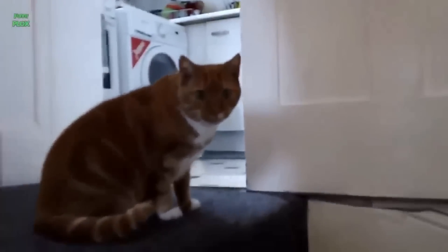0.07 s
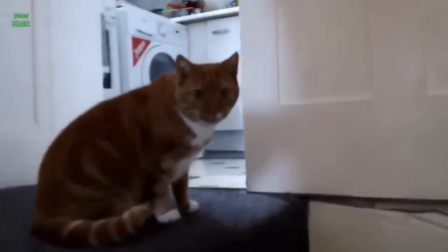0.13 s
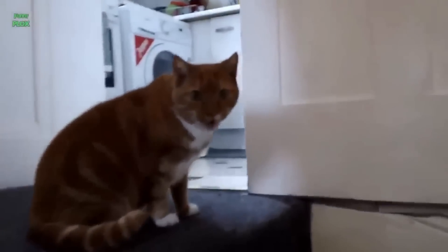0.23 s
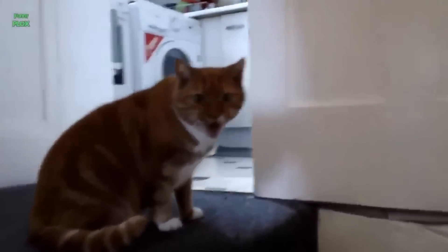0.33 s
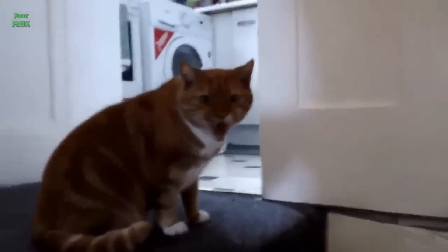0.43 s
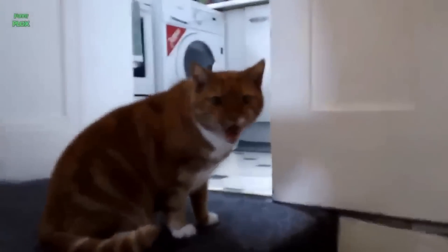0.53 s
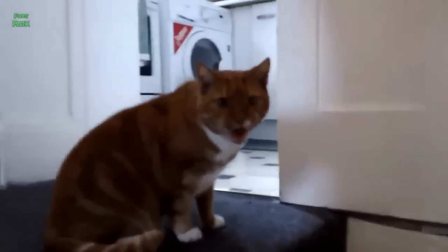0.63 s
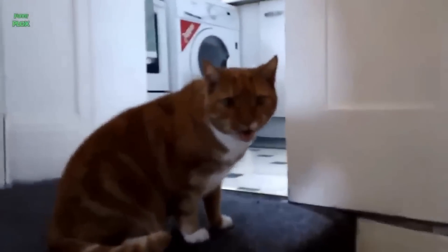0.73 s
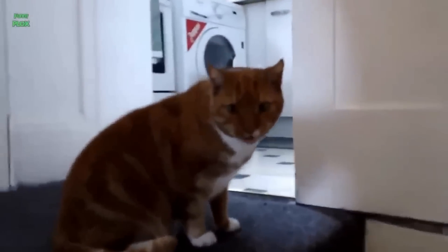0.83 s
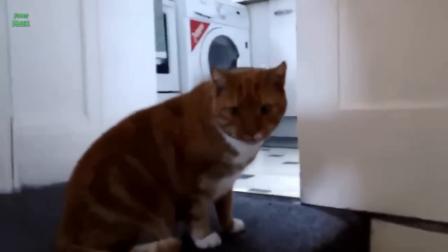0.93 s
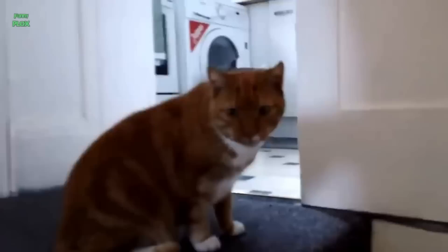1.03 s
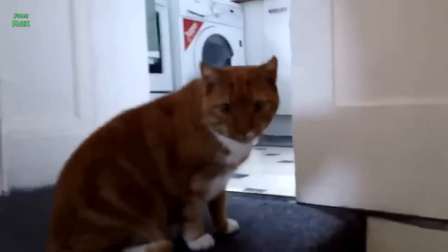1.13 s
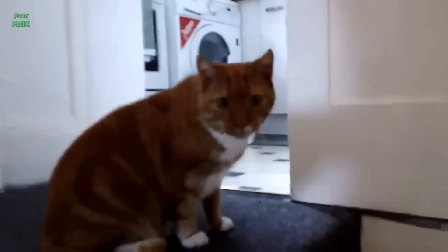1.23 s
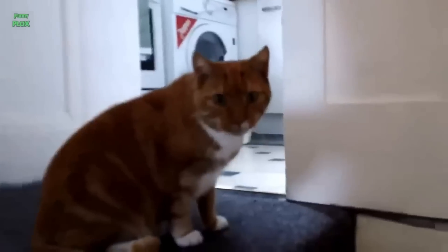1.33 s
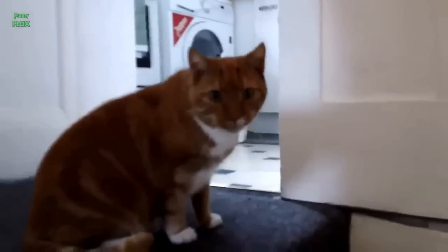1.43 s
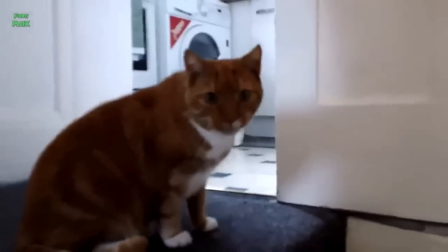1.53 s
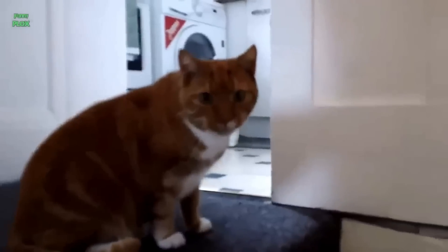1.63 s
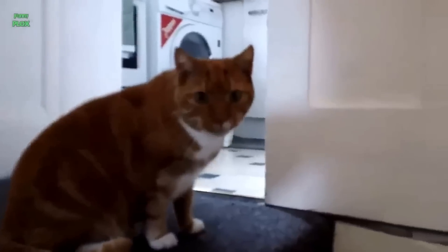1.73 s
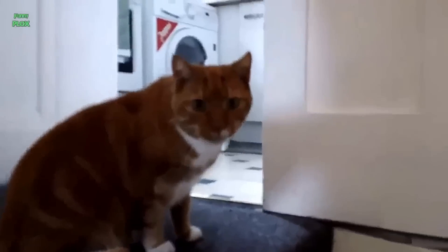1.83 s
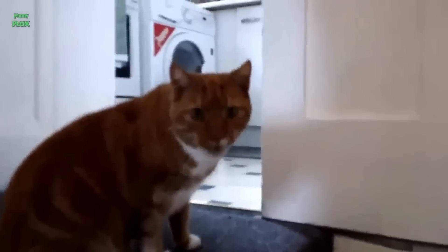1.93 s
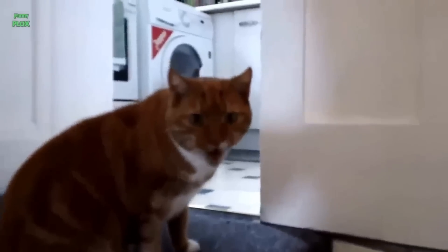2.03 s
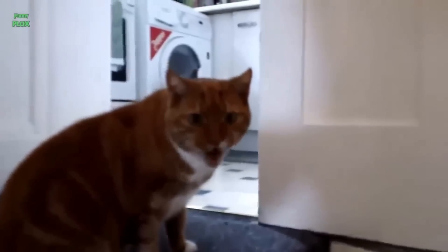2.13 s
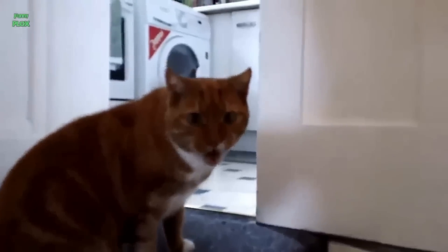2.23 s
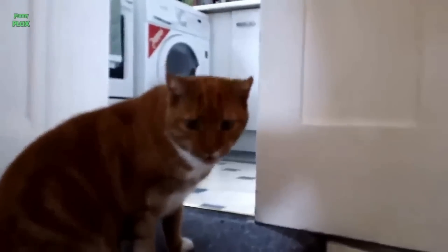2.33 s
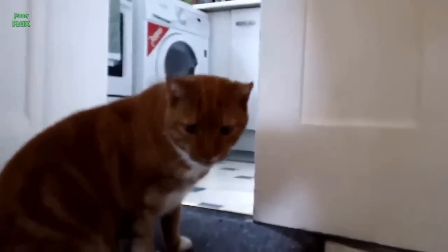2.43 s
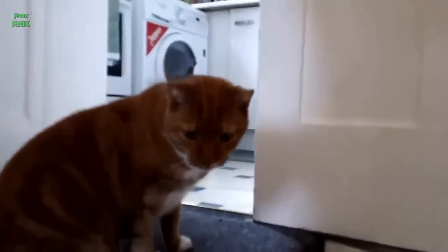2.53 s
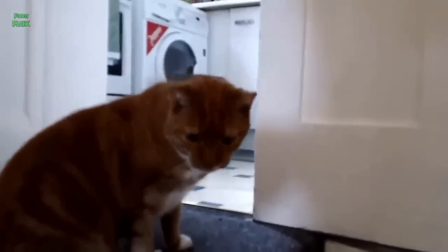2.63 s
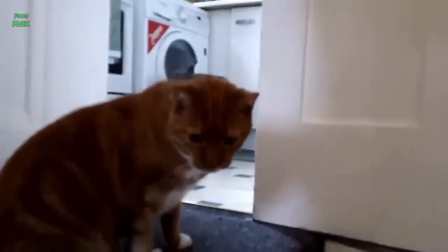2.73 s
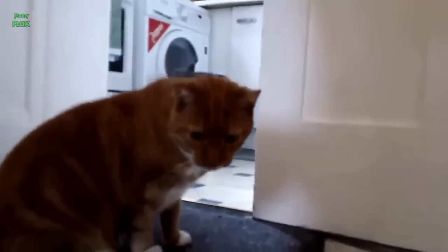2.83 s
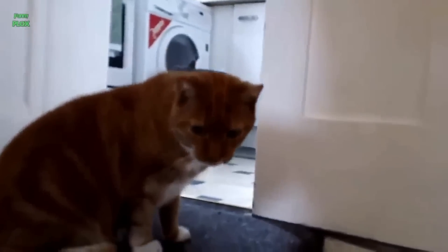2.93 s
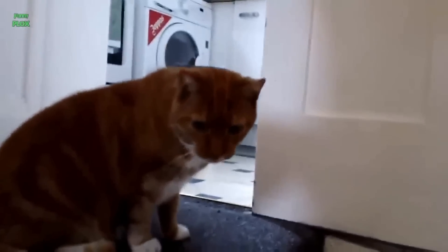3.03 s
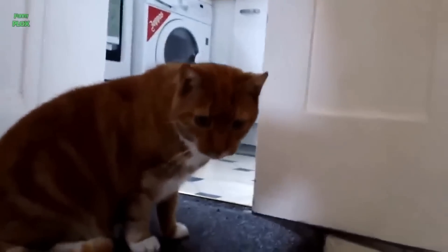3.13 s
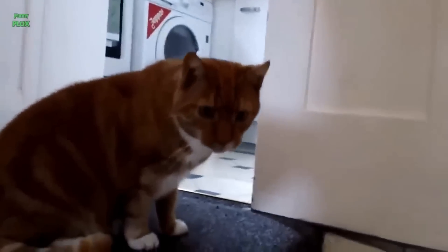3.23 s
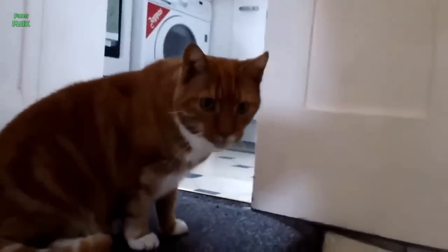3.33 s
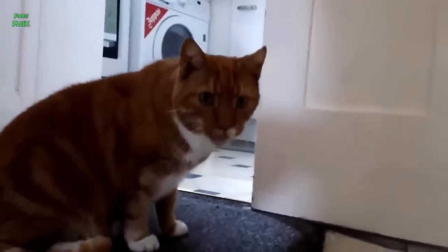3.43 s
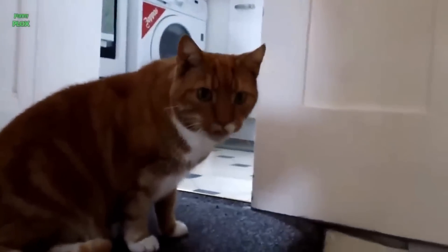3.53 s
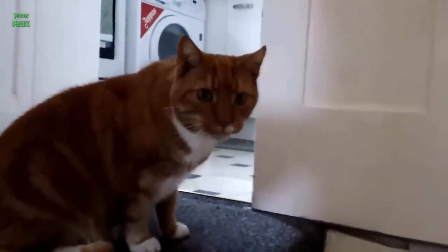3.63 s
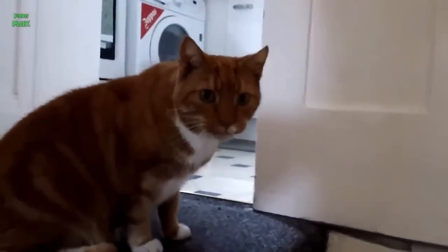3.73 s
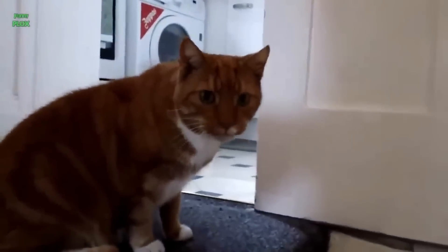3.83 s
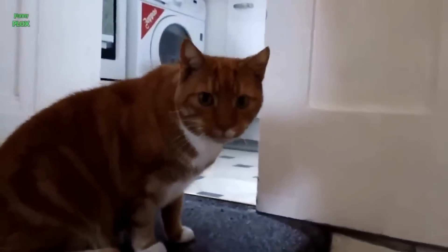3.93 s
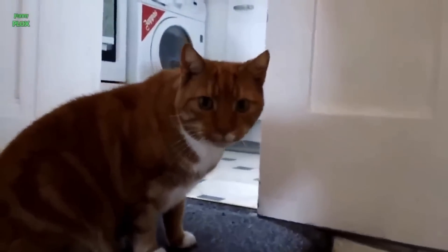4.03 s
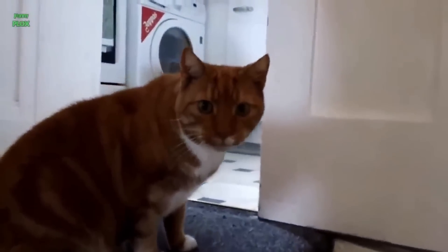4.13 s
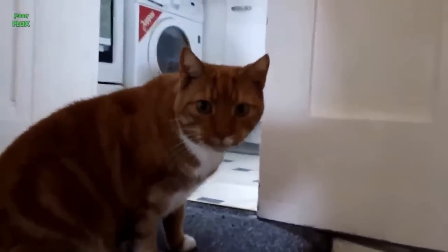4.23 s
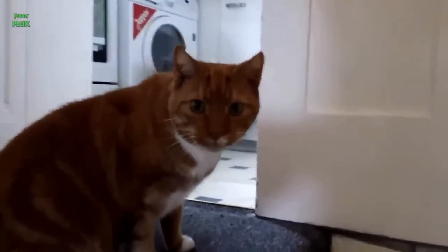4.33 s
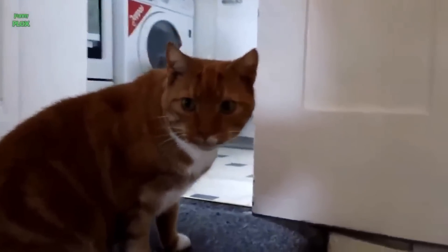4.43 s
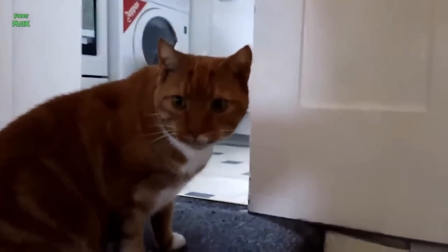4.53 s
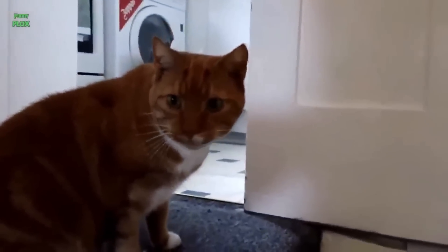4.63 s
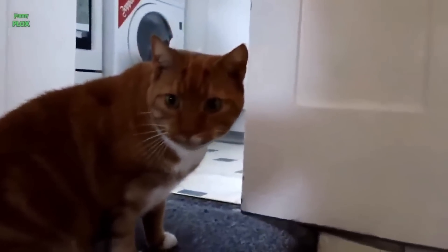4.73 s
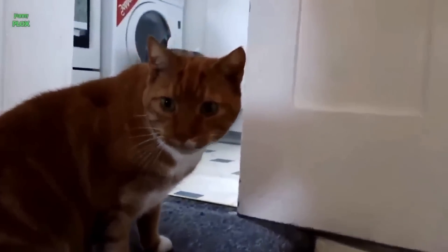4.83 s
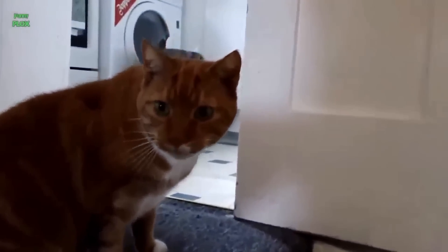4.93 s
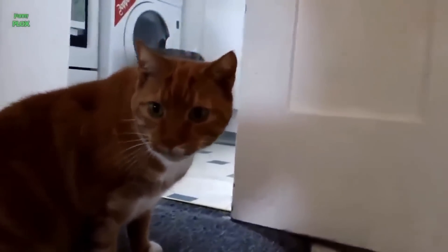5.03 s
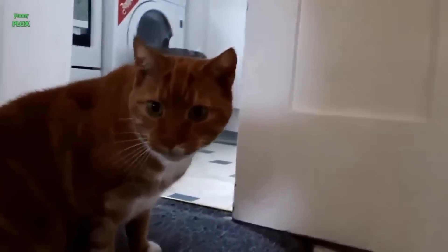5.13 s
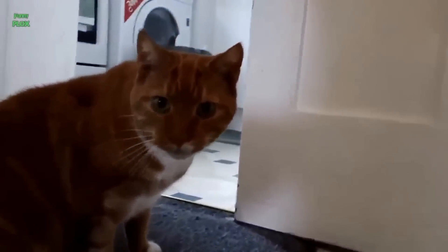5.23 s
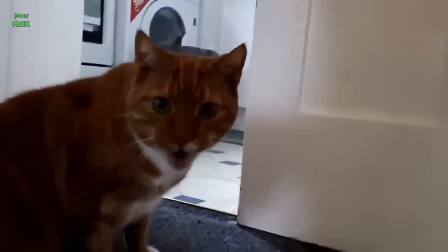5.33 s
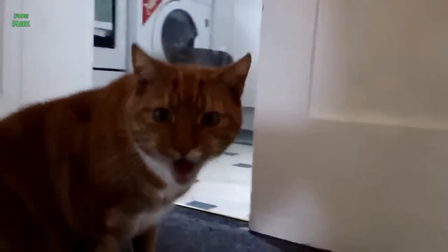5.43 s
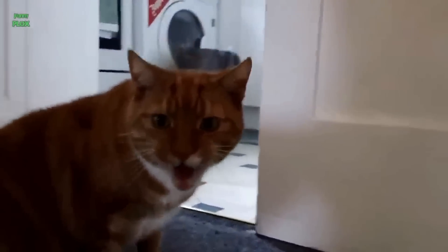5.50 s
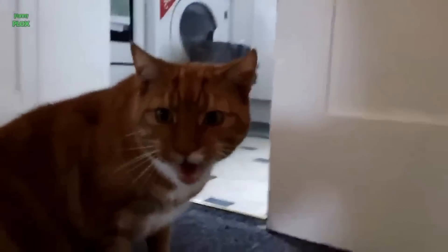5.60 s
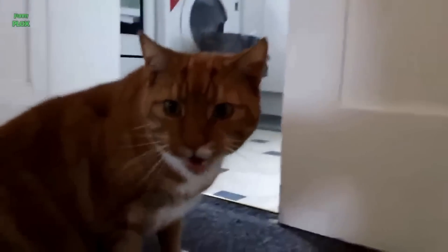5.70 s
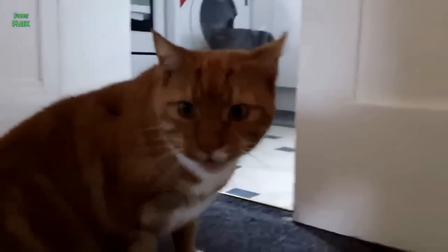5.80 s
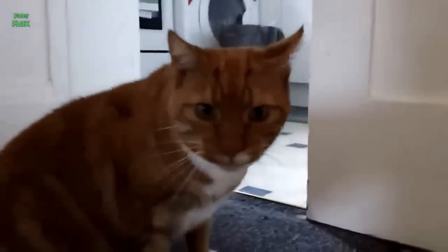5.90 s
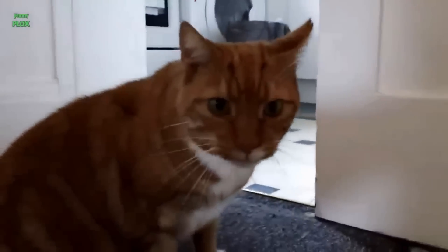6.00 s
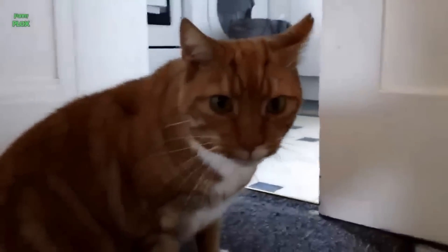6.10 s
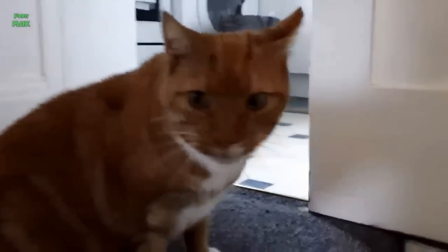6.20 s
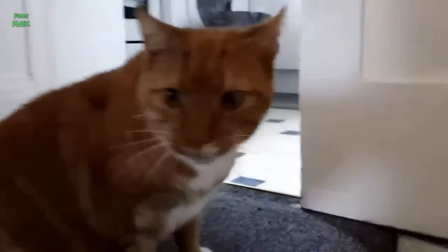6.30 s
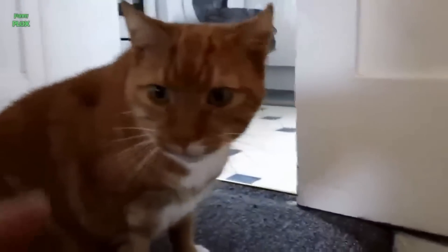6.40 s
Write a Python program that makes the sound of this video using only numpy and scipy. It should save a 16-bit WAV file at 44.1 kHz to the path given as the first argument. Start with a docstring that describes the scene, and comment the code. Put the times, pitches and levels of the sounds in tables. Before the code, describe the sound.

A quiet small room with soft hiss and barely audible appliance hum. Dull footfalls and a carpet scuff lead to a nearby cat's bright, rough-edged meow. A hard snap precedes its clipped second call, then fabric brushes and a bunch of keys jingles and lands hard on a wooden surface. The background sinks and slowly returns before one last meow. Handheld microphone, mono, short room reflections.

```python
"""Room noise, a faint hum, a few soft footfalls and a scuff on carpet; then a cat meows close by, three times in all.
Each call cracks at its start and darkens as the mouth closes: harmonics through moving resonances.
Between calls cloth scuffs, something snaps sharply, and keys rattle, land with a knock on wood and slide.
Blows are noisy pushes ringing a body; scuffs and the slide are shaped noise.
A small room answers everything but the cloth scuffs and background.
A gain control ducks the whole sound after each loud event, then creeps back.
"""
import sys
import numpy as np
from scipy import signal
from scipy.fft import rfft, irfft, next_fast_len
from scipy.io import wavfile
from scipy.ndimage import map_coordinates

SR = 44100
rng = np.random.default_rng(int(sys.argv[2]) if len(sys.argv) > 2 else 0)


def wrap_up_sound(samples):
    """Save the sound to the file named by the first command line argument, as 16-bit audio."""
    columns = np.atleast_2d(samples).T
    # keep every value between -1 and 1, then stretch to whole-number steps
    tamed = np.clip(columns, -1, 1)
    steps = np.round(tamed * 32767).astype(np.int16)
    wavfile.write(sys.argv[1], SR, steps)


N = 284886  # samples

# steady room noise, colour: freq_hz, relative_db
HUSH_COLOUR = [(15, -50), (25, -17.5), (64, -3.5), (101, -9.5), (129, -5), (226, -3), (313, -4.5),
               (456, -3.5), (759, -10), (1610, -13.5), (2540, -16), (8530, -23), (12400, -30.5),
               (15400, -18)]
# household appliance hum: freq_hz, level_db
HUM_TONES = [(66, -69.5), (98, -67)]
# room decay: freq_hz, t60_s
ROOM_DECAY = [(150, 0.29), (600, 0.34), (2500, 0.28), (6000, 0.27), (14000, 0.1)]

# soft footfalls and bumps: start_s, relative_db
THUMP_EVENTS = [(.066, -37.5), (.192, -35), (.541, -33.5), (1.025, -42.5), (2.524, -37), (2.811, -28.5),
                (2.848, -36), (3.605, -29), (4.362, -41)]
# footfall colour: freq_hz, relative_db
THUMP_COLOUR = [(30, -23), (90, -8), (150, 1), (210, 9.5), (310, -1), (480, -9.5), (1000, -23), (4000, -71)]
# scuffs of cloth on carpet: start_s, level_db, rise_s, t60_s
SCUFF_EVENTS = [(0.498, -42.5, 0.002, 0.45), (1.734, -49.5, 0.0036, 0.75), (2.52, -37.5, 0.0015, 0.65),
                (2.629, -40, 0.16, 1), (4.362, -46, 0.0024, 0.67), (5.08, -45.5, 0.017, 0.3),
                (6.086, -38.5, 0.014, 0.48)]
# cloth colour: freq_hz, relative_db
CLOTH_COLOUR = [(35, -59), (60, -26), (295, -3), (428, -7), (1880, -13), (8620, -27.5), (12500, -35.5),
                (14000, -28), (15000, -33)]

# hard, dry snap: start_s, relative_db
SNAP_EVENTS = [(2.2295, 1.5)]
# snap colour: freq_hz, relative_db
SNAP_COLOUR = [(100, -16), (700, -16.5), (1600, -15), (2100, -5.5), (2700, -0.5), (3300, 0), (3850, -11),
               (4600, -3), (5200, 0), (6100, -26), (6900, -8), (8600, -12), (11000, -18.5), (15000, -13.5)]
# light taps on something small and hollow: start_s, peak_db
TAP_EVENTS = [(2.046, -40.5), (2.523, -32), (3.017, -20), (3.102, -34), (3.478, -33), (3.4895, -21),
              (3.549, -25.5), (3.675, -5), (3.713, -21), (3.731, -22), (3.754, -24.5)]
# resonances of the hollow thing: freq_hz, width_hz, relative_db
SHELL_MODES = [(2155, 580, -5), (2830, 305, 4), (3650, 270, -1.5), (5230, 460, -9.5)]

# knocks on wood: start_s, relative_db
KNOCK_EVENTS = [(2.636, -30.5), (3.611, -13.5), (3.627, -15), (3.674, -14.5), (3.711, -24), (3.751, -31),
                (3.838, -21.5), (3.857, -25)]
# resonances of the board: freq_hz, width_hz, relative_db
WOOD_MODES = [(400, 127, -4), (623, 62, 3), (827, 110, -0.5), (1180, 163, -5), (1530, 170, -6.5),
              (1737, 100, -7), (2760, 180, -21.5)]

# clearest clinks of key against key: start_s, peak_db
CLINK_EVENTS = [(3.101, -23), (3.229, -33), (3.287, -27), (3.4, -33), (3.611, -5), (3.62, 2.5),
                (3.751, -11.5), (3.862, -26.5)]
# thin, very high tinks of metal: start_s, level_db
TINK_EVENTS = [(1.74, -33.5), (2.696, -27.5)]
# undamped modes of the keys: freq_hz, relative_db, t60_s
KEY_MODES = [(5066, -17, .12), (7170, -5, .2), (7340, -6, .2), (7930, -7, .18), (8560, -2, .18),
             (8680, -6, .27), (9600, -12, .09), (11200, -5, .24), (14100, -2, .1), (14560, 3, .2),
             (14900, 1, .1)]
# colour of the sliding keys: freq_hz, relative_db
SCRAPE_COLOUR = [(71, -61.5), (120, -11.5), (192, -21.5), (415, -0.5), (498, -17), (563, -7), (955, -9.5),
                 (2870, -11), (4300, -19), (7920, -23.5), (8770, -10), (15500, -31.5)]
# loose rattle: full level, dB gained over the rise, dB per s lost after the landing
RATTLE_START_S, RATTLE_RISE_S, RATTLE_LENGTH_S = 3.435, 0.11, 0.36
RATTLE_DB, RATTLE_RISE_DB, RATTLE_FADE_DB_PER_S = -22, 8.5, 39
LAND_S = 3.615
SLIDE_DB, SLIDE_ATTACK_S, SLIDE_HOLD_S, SLIDE_T60_S = -22, 0.0053, 0.081, 0.25

# voice through each call: time_s, pitch_hz, relative_db
VOICE_TRACKS = [
    [(0.58, 602.6, -27.5), (0.674, 564.4, -24), (0.69, 564.7, -22), (0.748, 566.9, -22),
     (0.776, 568.4, -28), (0.804, 565.5, -24.5), (0.974, 555.6, -31), (1.008, 553, -40),
     (1.024, 546, -38.5), (1.05, 557, -50)],
    [(2.315, 562, -27), (2.351, 571.5, -25.5), (2.385, 579.4, -28), (2.413, 574, -25),
     (2.475, 573.7, -34.5), (2.489, 569, -45), (2.519, 596, -46), (2.525, 593, -36), (2.587, 609.5, -40),
     (2.595, 609, -42)],
    [(5.6, 637, -27), (5.61, 626.4, -24.5), (5.682, 589.4, -24.5), (5.806, 557.6, -22.5),
     (5.812, 559.6, -24), (5.884, 548.5, -24.5), (5.902, 547.8, -28.5), (5.968, 545.8, -32),
     (6.006, 555.9, -41.5), (6.022, 548.6, -54)],
]
# crack opening each call: start_s, length_s, pitch_ratio, roughness_0_1, mouth_db
CRACK_SETTINGS = [(0.57, 0.0073, 1.29, 0.61, -3), (2.301, 0.0078, 1.19, 0.66, -4),
                  (5.579, 0.015, 1.2, 0.1, -9)]
# jaw: closing_start_s, lips_meet_s, mouth_open_hz, mouth_shut_hz, upper_open_hz
JAW_SETTINGS = [(0.716, 1.013, 2760, 1780, 3310), (2.397, 2.525, 2480, 2020, 3080),
                (5.64, 6.025, 2560, 2170, 3570)]
# call tone: upper_re_mouth_db, muzzle_re_mouth_db, throat_db, throat_tilt_db_per_octave
CALL_TONES = [(3.5, -1.5, -42, -1.5), (-5, -12.5, -44.5, 2), (-3, -6.5, -38.5, 3.5)]
# fixed throat colour: freq_hz, relative_db
THROAT_COLOUR = [(550, -3.5), (750, 3), (1150, 0), (1700, -13), (2400, -25), (4000, -50)]
# fixed muzzle colour: freq_hz, relative_db
MUZZLE_COLOUR = [(3200, -28), (3950, 1), (4500, -4), (5200, -5), (5700, -9.5), (6300, -16.5), (7200, -24.5),
                 (8500, -33), (15000, -51)]
UPPER_SHUT_HZ = 2700
UPPER_FADE_DB, MUZZLE_FADE_DB = 0.5, 13  # lost as the jaw closes
LIPS_DB, LIPS_S = 18, 0.005  # muffling of both when the lips meet
JAW_EASE = 1.7  # above 1: fast at first, slowing towards the end
RASP_BRIGHT_DB = 13.5  # muzzle boost at full roughness
THROAT_SHARE = 0.17  # how far the throat tone follows the call level, 0-1

# microphone notch in the top octave: freq_hz, gain_db
MICROPHONE_RESPONSE = [(11600, 1), (12150, -15.5), (12550, -16), (13100, -2.5), (13900, -6)]
TOP_HZ = 15500


def amp(db):
    """Amplitude ratio of a level in dB."""
    return 10 ** (np.asarray(db) / 20)


def unit(x):
    """Scale to rms 1."""
    return x / np.sqrt(np.mean(x ** 2) + 1e-20)


def clock(size):
    """Time in s of each sample."""
    return np.arange(size) / SR


def along(points, hz):
    """Interpolate (freq_hz, value) points on a log axis."""
    f, v = np.transpose(points)
    return np.interp(np.log(hz + 1), np.log(f + 1), v)


def wobble(rate_hz, size):
    """Smooth random curve, rate_hz knots a second."""
    knots = rng.standard_normal(int(size * rate_hz / SR) + 4)
    return map_coordinates(knots, [clock(size) * rate_hz])


def filtered(x, response):
    """Apply a response of frequency by FFT."""
    m = next_fast_len(len(x) + SR // 2)
    return irfft(rfft(x, m) * response(np.fft.rfftfreq(m, 1 / SR)), m)[:len(x)]


def noise(colour, size):
    """Coloured noise of rms 1."""
    return unit(filtered(rng.standard_normal(size), lambda hz: amp(along(colour, hz))))


def impulse(colour, size=4096):
    """Causal minimum-phase pulse of this colour, by folding the cepstrum."""
    cepstrum = irfft(np.log(amp(along(colour, np.fft.rfftfreq(size, 1 / SR)))))
    cepstrum[1:size // 2] *= 2
    cepstrum[size // 2 + 1:] = 0
    return irfft(np.exp(rfft(cepstrum)))


def resonator(modes):
    """Ring of a small body: decaying modes of alternating sign, no bass radiated."""
    t = clock(SR // 5)
    ring = np.zeros(len(t))
    for k, (hz, width_hz, db) in enumerate(modes):
        decay = width_hz * np.exp(-np.pi * width_hz * t)
        ring += amp(db) * decay * np.cos(2 * np.pi * hz * t) * (-1) ** k
    return signal.sosfilt(signal.butter(2, 220, "high", fs=SR, output="sos"), ring)


def blow(body, chatter, t60_s):
    """One push and a dying chatter of small contacts ring the body; peak 1."""
    t = clock(SR // 4)
    force = amp(-60 * t / t60_s) * rng.standard_normal(len(t))
    force *= chatter / np.linalg.norm(force)
    force[0] = 1  # the push
    hit = signal.fftconvolve(force, body)
    return hit / np.abs(hit).max()


def add(track, start_s, sound):
    """Mix a sound into the track."""
    part = track[max(round(start_s * SR), 0):][:len(sound)]
    part += sound[:len(part)]


def blows(events, body, chatter, t60_s):
    """A row of blows on one body."""
    out = np.zeros(N)
    for start_s, db in events:
        add(out, start_s, amp(db) * blow(body, chatter, t60_s))
    return out


def room(x, wet_db):
    """Add the room's answer: decaying noise whose treble dies first."""
    hz, t, z = signal.stft(rng.standard_normal(SR // 2), SR, nperseg=256)
    decay = amp(-60 * t / along(ROOM_DECAY, hz)[:, None])
    tail = signal.istft(z * decay, SR, nperseg=256)[1]
    tail[:round(.004 * SR)] = 0  # 4 ms before the first reflection
    return x + amp(wet_db) * signal.fftconvolve(x, tail / np.linalg.norm(tail))[:N]


def background():
    """Steady coloured noise and a faint hum, wavering in level and phase."""
    hum = np.zeros(N)
    for hz, db in HUM_TONES:
        level = amp(db + 0.68 * wobble(6.1, N)) * np.sqrt(2)
        hum += level * np.sin(2 * np.pi * hz * clock(N) + 0.38 * wobble(6, N))
    return hum + amp(-51.0 + 1.14 * wobble(2.74, N)) * noise(HUSH_COLOUR, N)


def shuffling():
    """Carpet: dull footfalls are short pulses, grainy scuffs are noise under stroke envelopes."""
    t, stroke = clock(N), np.zeros(N)
    for start_s, db, rise_s, t60_s in SCUFF_EVENTS:
        fade_db = -60 * np.maximum(t - start_s - rise_s, 0) / t60_s
        stroke += np.clip((t - start_s) / rise_s, 0, 1) * amp(db + fade_db)
    rub = stroke * unit(noise(CLOTH_COLOUR, N) * amp(0.75 * wobble(120, N)))
    thumps = amp(-1.5) * blows(THUMP_EVENTS, impulse(THUMP_COLOUR), chatter=0.87, t60_s=0.076)
    return rub + room(thumps, wet_db=1)


def clicks():
    """One sharp snap, and light rattling taps on a hollow body."""
    snap = amp(3) * blows(SNAP_EVENTS, impulse(SNAP_COLOUR), chatter=0.68, t60_s=0.017)
    taps = blows(TAP_EVENTS, resonator(SHELL_MODES), chatter=2.4, t60_s=0.032)
    return room(snap, wet_db=-6.5) + room(taps, wet_db=-5.0)


def knocks():
    """Blows excite the resonances of a wooden board."""
    hits = amp(8.5) * blows(KNOCK_EVENTS, resonator(WOOD_MODES), chatter=0.44, t60_s=0.04)
    return room(hits, wet_db=-5.5)


def rattle(count=24, spread_db=3):
    """Chance clinks (start_s, peak_db) that swell, hold until the landing and die after it."""
    when, force = rng.random((count, 2)).T
    s = RATTLE_START_S + (np.arange(count) + when) / count * RATTLE_LENGTH_S
    rising = np.maximum(1 - (s - RATTLE_START_S) / RATTLE_RISE_S, 0)
    db = RATTLE_DB - RATTLE_RISE_DB * rising - RATTLE_FADE_DB_PER_S * np.maximum(s - LAND_S, 0)
    return list(zip(s, db + spread_db * (2 * force - 1)))


def clink(start_s, detune=0.004, spread_db=3, held_t60_s=0.045):
    """Contact clusters ring detuned metal modes, damped while the keys are held or lie flat."""
    t = clock(SR // 3)
    hz, db, t60_s = np.transpose(KEY_MODES)[:, :, None]
    strength, turn, key = rng.standard_normal((3, len(KEY_MODES), 1))
    level = amp(db + spread_db * strength - 60 * t / t60_s)
    ring = np.sum(level * np.sin(2 * np.pi * (hz * (1 + detune * key) * t + turn)), axis=0)
    grip = np.interp(start_s, [3.3, 3.5, 3.6, 3.7], [1, 0, 0, .3])  # held, loose, lying flat
    tick_colour = [(100, -38), (1500, -7.0), (5000, -4.5), (9000, -11.0), (15000, 1)]
    tick = 3 * amp(-60 * t / 0.029) * noise(tick_colour, len(t))
    return blow(ring * amp(-60 * grip * t / held_t60_s) + tick, chatter=1.74, t60_s=0.039)


def keys():
    """Clinks and a loose rattle, thin tinks as wavering tones, and a grainy noise slide to rest."""
    out, t = np.zeros(N), clock(SR // 3)
    for start_s, db in list(CLINK_EVENTS) + rattle():
        add(out, start_s, amp(db) * clink(start_s))
    for start_s, db in TINK_EVENTS:
        envelope = amp(db - 60 * t / 0.072) * np.tanh(t / 0.0023)
        add(out, start_s, envelope * np.sin(2 * np.pi * 14100 * t + wobble(400, len(t))))
    slide_db = SLIDE_DB - 60 * np.maximum(t - SLIDE_HOLD_S, 0) / SLIDE_T60_S
    slide = np.clip(t / SLIDE_ATTACK_S, 0, 1) * amp(slide_db)
    add(out, LAND_S, slide * unit(noise(SCRAPE_COLOUR, len(t)) * amp(6.0 * wobble(151, len(t)))))
    return room(out, wet_db=-4)


def resonance(hz, centre_hz, width_hz):
    """Power gain of one mouth resonance."""
    return 1 / (1 + ((hz - centre_hz) / width_hz) ** 2) ** 2


def shared_power(db, shape):
    """Power at db, shared among the harmonics by an amplitude shape."""
    return amp(db) ** 2 * shape ** 2 / np.sum(shape ** 2, axis=0)


def meow(voice, crack, jaw, tone, width_hz=390, upper_width_hz=500, jitter=0.0032, rough=0.039,
         settle_s=0.025, flutter_db=2.5):
    """Vocal-fold harmonics through throat, muzzle and two mouth resonances that sink as the jaw closes."""
    start_s, crack_s, pitch_ratio, rasp, crack_db = crack
    closing_s, shut_s, open_hz, shut_hz, upper_open_hz = jaw
    upper_db, muzzle_db, throat_db, tilt_db = tone
    s, *columns = np.transpose(voice)
    size = int((s[-1] - start_s + .05) * SR)
    t = clock(size)
    now_s = start_s + t
    pitch_hz, level_db = [np.interp(now_s, s, c) for c in columns]

    # the folds start high and unsteady, then drop into a cleaner tone
    high = 1 - np.tanh(np.maximum(t - crack_s, 0) / 0.00475)
    unsteady = rasp * np.exp(-t / settle_s)
    pitch_hz = pitch_hz * (1 + (pitch_ratio - 1) * high)
    pitch_hz = pitch_hz * (1 + (jitter + 0.03 * unsteady) * wobble(161.8, size))
    order = np.arange(1, 25)[:, None]
    hz = order * pitch_hz

    # closing lowers the resonances and dulls the call
    closing = 1 - np.clip((shut_s - now_s) / (shut_s - closing_s), 0, 1) ** JAW_EASE
    mouth_hz = open_hz + (shut_hz - open_hz) * closing
    upper_hz = upper_open_hz + (UPPER_SHUT_HZ - upper_open_hz) * closing
    lips_db = -LIPS_DB * (1 + np.tanh((now_s - shut_s) / LIPS_S)) / 2
    upper_db = upper_db + lips_db - UPPER_FADE_DB * closing
    muzzle_db = muzzle_db + RASP_BRIGHT_DB * unsteady + lips_db - MUZZLE_FADE_DB * closing
    oral = shared_power(0, resonance(hz, mouth_hz, width_hz))
    oral += shared_power(upper_db, resonance(hz, upper_hz, upper_width_hz))
    oral += shared_power(muzzle_db, amp(along(MUZZLE_COLOUR, hz)))

    # each harmonic flutters on its own
    flutter = amp(flutter_db * np.array([wobble(23.7, size) for k in order]))
    mouth_power = shared_power(level_db + crack_db * high, flutter * np.sqrt(oral))
    throat_db = throat_db + THROAT_SHARE * (level_db - level_db.max())
    throat_shape = amp(along(THROAT_COLOUR, hz) + tilt_db * np.log2(order))
    throat_power = shared_power(throat_db, flutter * throat_shape)
    gains = np.sqrt(2 * (mouth_power + throat_power))

    # phase lags on passing through the mouth resonance
    phase = 2 * np.pi * np.cumsum(hz, axis=1) / SR - 2 * np.arctan((hz - mouth_hz) / width_hz)
    air = np.array([wobble(600, size) + 1j * wobble(600, size) for k in order])
    harmonics = np.real(np.exp(1j * phase) * (1 + (rough + unsteady) * air))
    call = np.sum(gains * harmonics, axis=0)
    release = amp(-60 * np.maximum(now_s - s[-1], 0) / 0.0095)
    return call * np.clip(t / 0.0035, 0, 1) * release


def cat():
    """Three calls, close enough to stay nearly dry."""
    out = np.zeros(N)
    for voice, crack, jaw, tone in zip(VOICE_TRACKS, CRACK_SETTINGS, JAW_SETTINGS, CALL_TONES):
        add(out, crack[0], meow(voice, crack, jaw, tone))
    return room(amp(1.0) * out, wet_db=-10.5)  # +1 dB


def scene():
    """Mix of all sources, the same in both channels."""
    mono = background() + shuffling() + clicks() + knocks() + keys() + cat()
    return np.array([mono, mono])


def gain_control(x, threshold_db=-26, slope=0.66, recovery_db_per_s=9, lag_s=0.0012):
    """Gain falls just after a loud sound and creeps back at a steady dB rate."""
    smooth_n = .012 * SR  # 12 ms
    power = signal.lfilter([1], [1, -np.exp(-1 / smooth_n)], x[0] ** 2) / smooth_n
    excess_db = slope * np.maximum(10 * np.log10(power + 1e-12) - threshold_db, 0)
    t = clock(N)
    recovery_db = recovery_db_per_s * t
    gain_db = recovery_db - np.maximum.accumulate(excess_db + recovery_db)
    return x * amp(np.interp(t - lag_s, t, gain_db))


def record(dry):
    """Gain control, overload clipping, the microphone's notch and the band limit."""
    held = np.clip(gain_control(dry), -.62, .62)

    def response(hz):
        return amp(along(MICROPHONE_RESPONSE, hz)) / (1 + (hz / TOP_HZ) ** 120)

    return np.array([filtered(x, response) for x in held])


dry = scene()
out = record(dry)
wrap_up_sound(out)
```